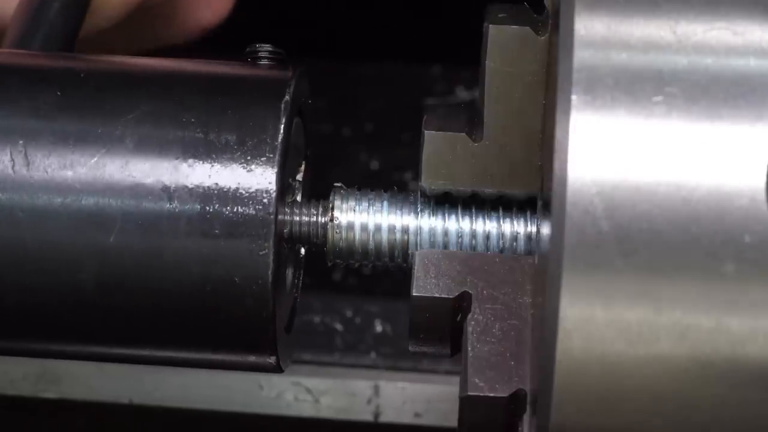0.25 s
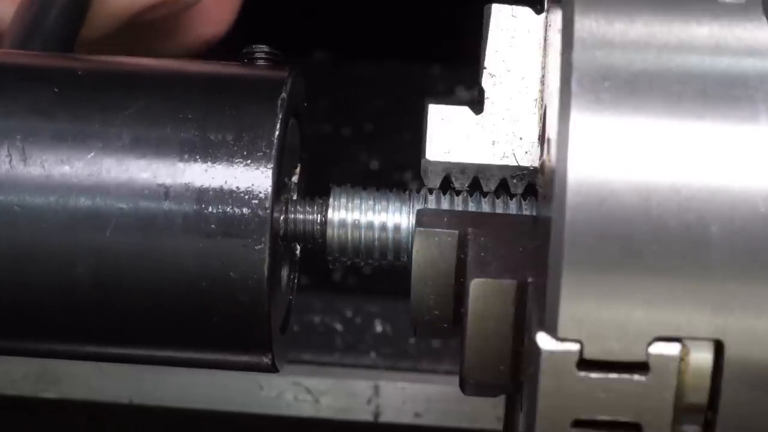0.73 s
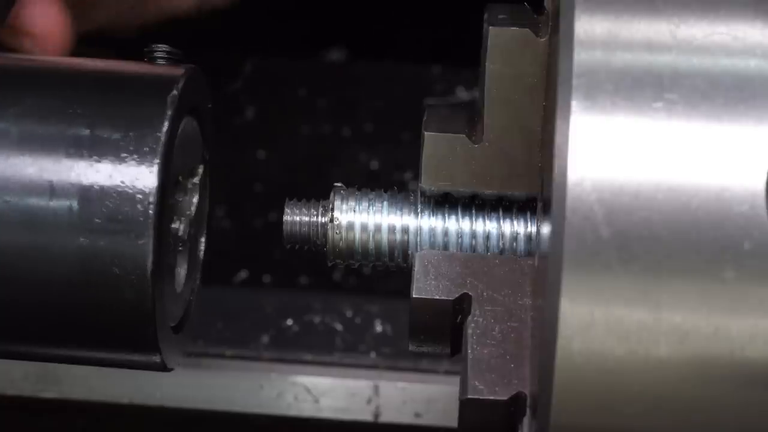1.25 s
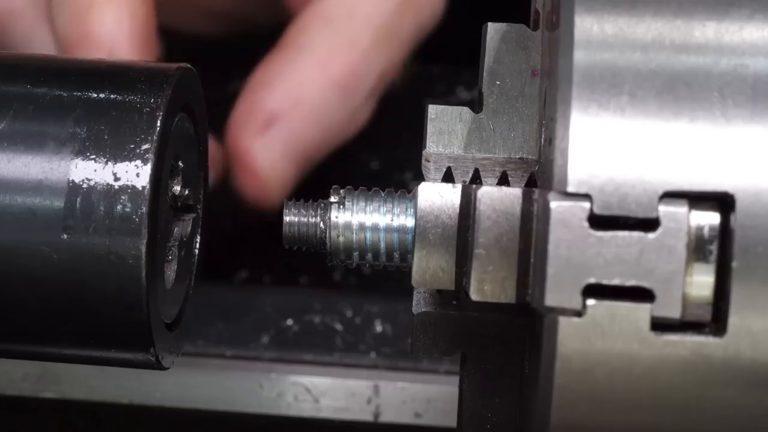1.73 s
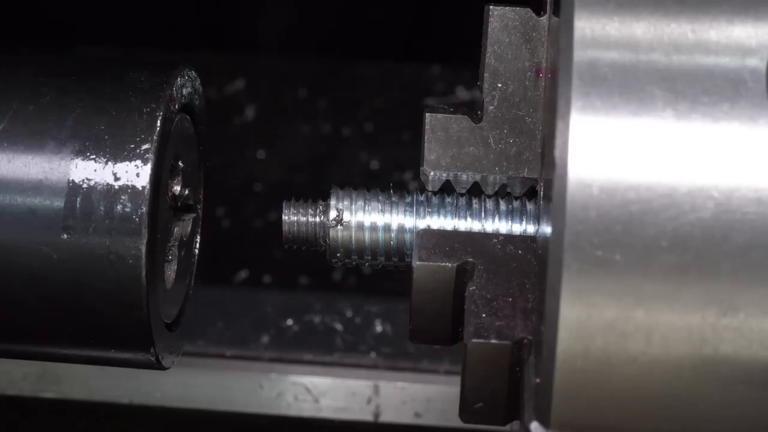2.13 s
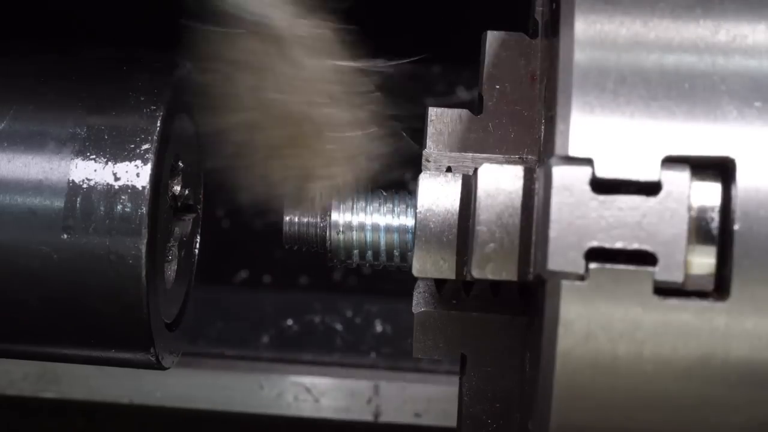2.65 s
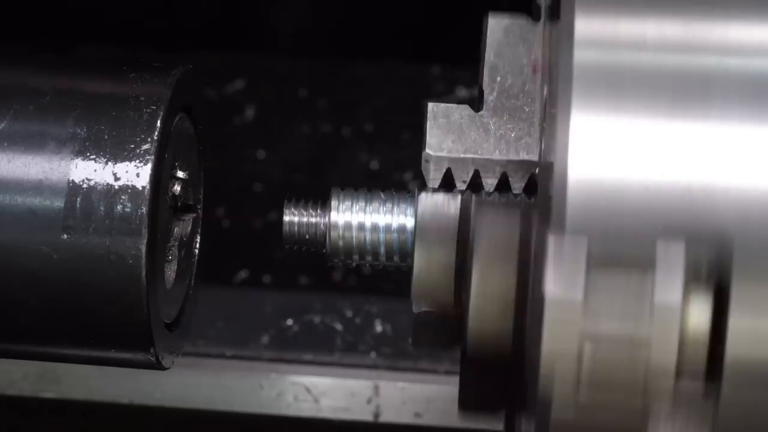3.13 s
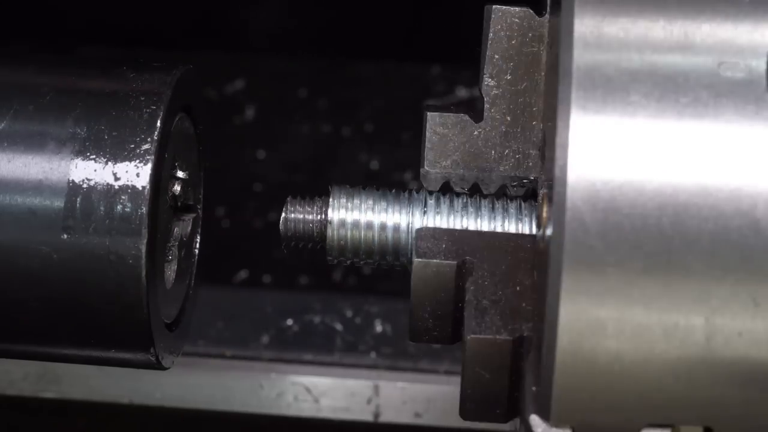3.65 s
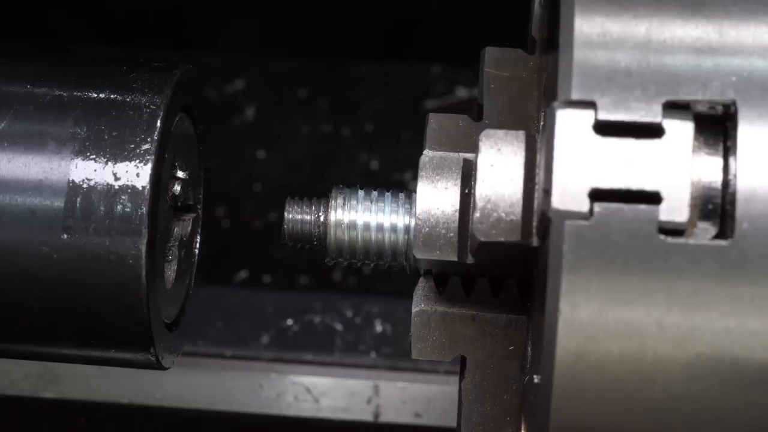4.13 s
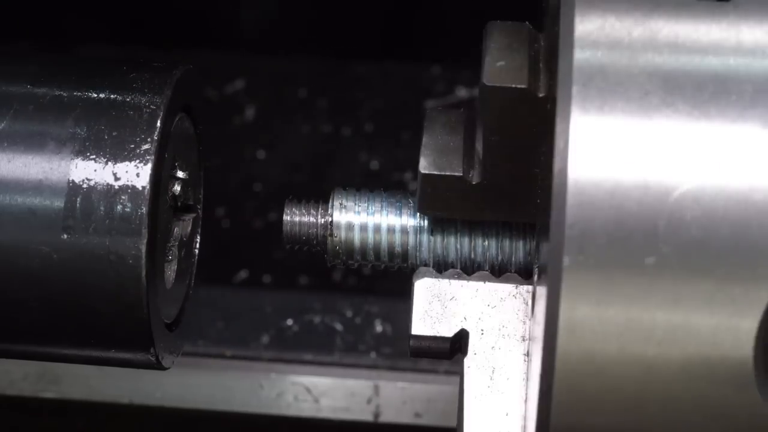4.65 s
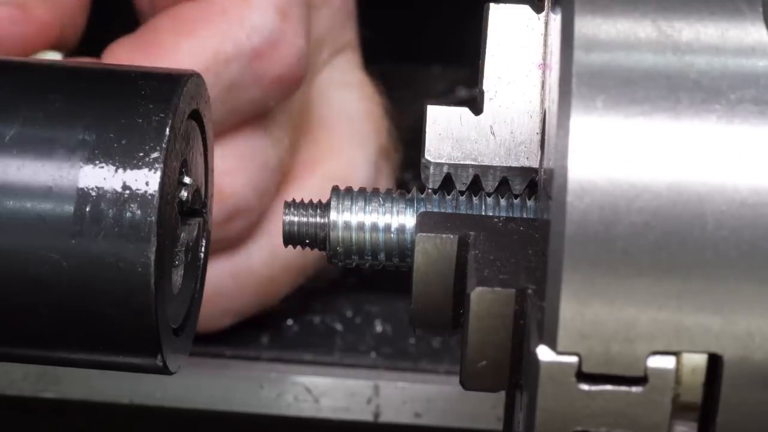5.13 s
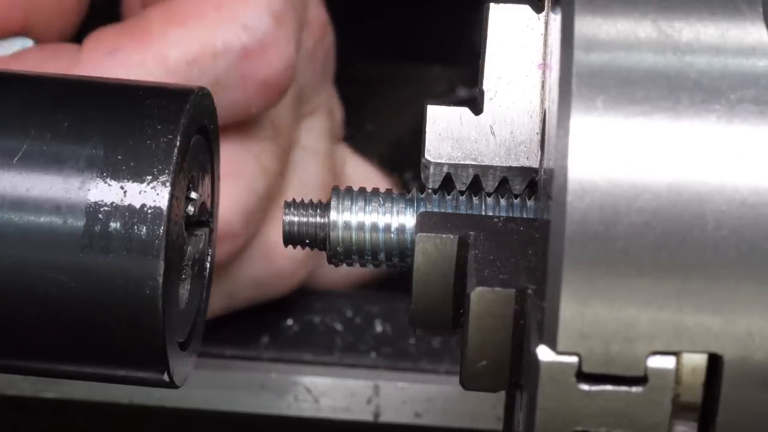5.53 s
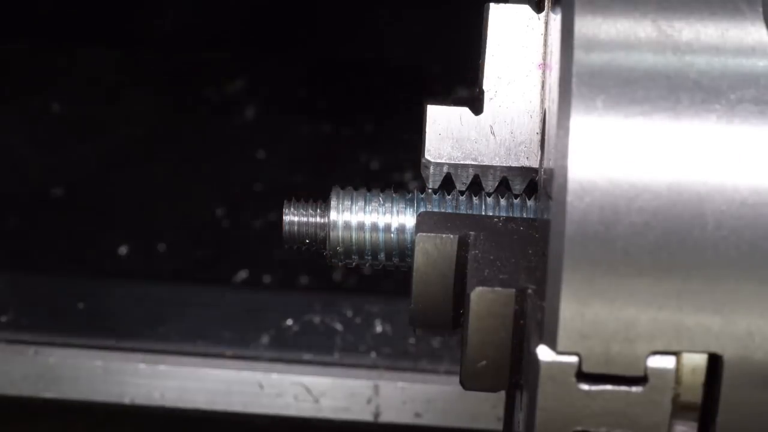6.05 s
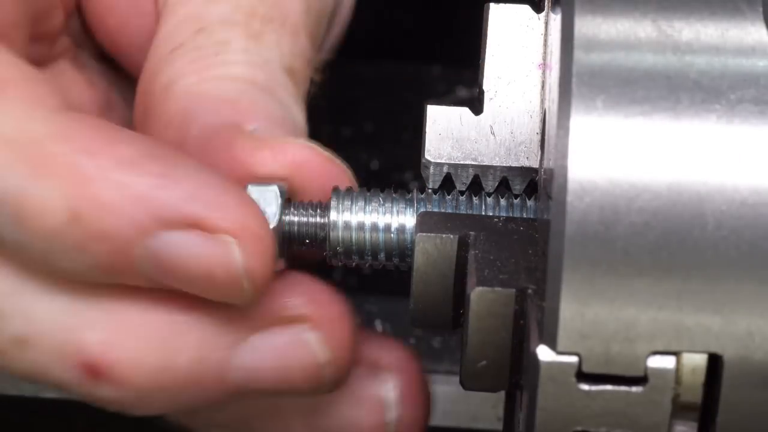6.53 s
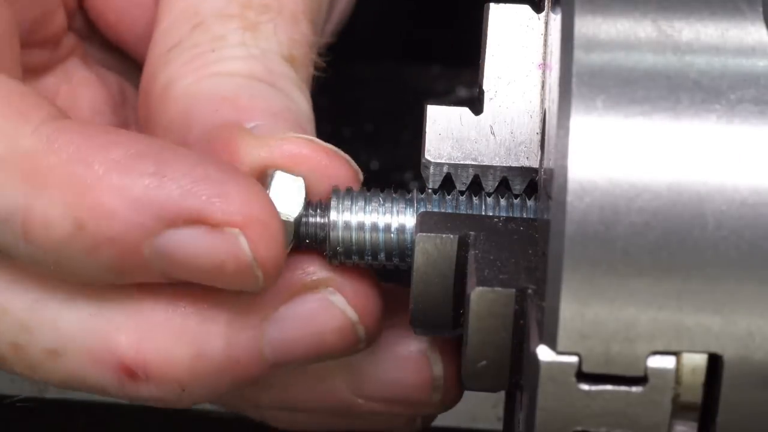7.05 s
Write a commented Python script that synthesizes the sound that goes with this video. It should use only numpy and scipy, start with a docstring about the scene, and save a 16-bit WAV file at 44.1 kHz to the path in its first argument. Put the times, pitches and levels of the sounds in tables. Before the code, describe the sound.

Close, dry, slightly left-leaning sounds of steel parts on a lathe: a rattling snap, irregular knocks with gritty rubbing and a hollow thud, then soft, quick bristle swishes with one thin clink. Sparse faint knocks lead to a double bang across the workshop. Handling resumes, bursting into hard knocks and bright, short-ringing clinks; one more distant bang echoes, then tiny ticks and light knocks as a nut is tried. Low hum and hiss underneath.

```python
"""A catch snaps over on a small lathe; a die holder is backed off a stud, its knocks and rubbing ringing
castings and steel as decaying modes while the bed thumps. Bristle noise brushes the thread, and a ferrule
clinks. Later something bangs further off in the workshop, a crack and a swelling echo; the holder is pulled
away in loud knocks and clinks, and a nut is tried with light knocks and bright ticks.
Filtered noise makes a faint hum and microphone hiss throughout."""
import sys
import numpy as np
from scipy import signal
from scipy.fft import rfft, irfft
from scipy.io import wavfile
from scipy.ndimage import uniform_filter1d

SR = 44100
rng = np.random.default_rng(int(sys.argv[2]) if len(sys.argv) > 2 else 0)


def digitize_waveform(pressure):
    """Quantize a signal to 16-bit integers and store it at the path in sys.argv[1].

    Rows of a 2-D input are taken as channels; values are limited to [-1, 1].
    """
    field = np.atleast_2d(pressure).T
    bounded = np.clip(field, -1, 1)
    quanta = np.round(bounded * 32767).astype(np.int16)
    wavfile.write(sys.argv[1], SR, quanta)


def attenuation_scalar(level_db):
    """Turn a level in dB into a linear amplitude multiplier (20 dB per decade)."""
    decades = np.asarray(level_db, float) / 20
    return 10 ** decades


N = 321930

# modes of the lathe castings: f/Hz, level/dB, t60/s
CASTING_MODES = [(358, 0.5, 0.02), (432, 6, 0.022), (520, -8.5, 0.079), (647.6, 3, 0.025),
                 (707, 4.5, 0.045), (828.6, 1, 0.049), (916, 14, 0.013), (1080, 2, 0.024), (1164, 6, 0.023)]
# modes of the steel parts: f/Hz, level/dB, t60/s
STEEL_MODES = [(1400, 3, 0.023), (1530, 4, 0.016), (1855, 6.5, 0.021), (2276, 0, 0.034), (2360, 2, 0.019),
               (2495, -8.5, 0.048), (3033, -3, 0.044), (3315, -3.5, 0.039), (3640, 4.5, 0.025),
               (4028, 7, 0.012), (4460, -3, 0.016)]
# spectrum of a bright scratch: f/Hz, density level/dB
EDGE_SPECTRUM = [(4000, -10.5), (5500, -3.5), (8000, -2), (11000, 1.5), (14000, -10), (16500, -30.5)]


def evened(x):
    """Normalization to rms 1, the root of the mean power."""
    return x / np.sqrt(np.mean(x ** 2) + 1e-20)


def peaked(x):
    """Normalization to peak magnitude 1."""
    return x / (abs(x).max() + 1e-20)


def read(points, hz):
    """Linear interpolation of a spectrum on a logarithmic frequency axis."""
    f, value = np.transpose(points)
    return np.interp(np.log(hz + 1), np.log(f + 1), value)


def add(mix, s, sound):
    """Superposition: a sound is summed into the mix from s seconds on."""
    part = mix[..., round(s * SR):][..., :sound.shape[-1]]
    part += sound[..., :part.shape[-1]]


def smooth_noise(size, width):
    """Moving average as a low-pass: slow random fluctuation of rms 1."""
    return evened(uniform_filter1d(rng.standard_normal(size), size=width))


def coloured(points, size):
    """Spectral shaping: white noise weighted to a given spectrum, rms 1."""
    z = rfft(rng.standard_normal(size))
    z = z * attenuation_scalar(read(points, np.fft.rfftfreq(size, 1 / SR)))
    return evened(irfft(z, size))


def humming(peaks, size):
    """Resonance: noise of rms 1 under a sum of broad peaks."""
    hz = np.fft.rfftfreq(size, 1 / SR)
    colour = sum(attenuation_scalar(db) / (1 + (2 * (hz - f) / width) ** 2) for f, width, db in peaks)
    return evened(irfft(rfft(rng.standard_normal(size)) * colour, size))


def ring(modes, size, spread_db, detune):
    """Modal decay: a row a mode; every blow lands elsewhere and weighs and tunes the modes anew."""
    hz, db, t60 = np.transpose(modes)[:, :, None]
    weigh, shift = rng.standard_normal((2, len(modes), 1))
    t = np.arange(size) / SR
    decay = attenuation_scalar(db + spread_db * weigh - 60 * t / np.maximum(t60, .005))
    onset = 1 - np.exp(-(hz * t / 1.465) ** 2)  # takes about a cycle
    return decay * onset * np.sin(2 * np.pi * hz * (1 + detune * shift) * t)


def contact(ms, size):
    """Contact force: a rough burst that swells and dies on the time scale ms."""
    u = np.arange(size) / SR * 1000 / max(ms, .1)
    return rng.standard_normal(size) * u ** 0.89 * np.exp(-4.5 * u)


def struck(force, modes):
    """Forced response: the force convolved with the impulse response of the modes; peak 1."""
    return peaked(signal.fftconvolve(force, modes)[:len(force)])


def placed(x, pan_db):
    """Intensity stereo: left exceeds right by pan_db."""
    return x * attenuation_scalar([[pan_db / 2], [-pan_db / 2]])


def clack(ms):
    """Impact sequence: a scuff of the faces, the blow 20 ms in, and its bounce."""
    late = round(rng.uniform(4, 12) * SR / 1000)  # the faces meet again 4-12 ms later
    t_ms = np.arange(4096) / SR * 1000 - 20
    bounce = np.roll(contact(ms, size=4096), late)
    blow = peaked(contact(ms, size=4096) + attenuation_scalar(-12.5) * bounce)
    scuff = rng.standard_normal(4096) * np.exp(np.minimum(t_ms, 0) / 2.9) * (t_ms < 0) / 3
    return np.roll(blow, round(.02 * SR)) + attenuation_scalar(-16.5) * scuff


def near_pitch(modes, hz, fall_db):
    """Selective excitation: modes weaken by fall_db an octave away from the pitch of the spot hit."""
    mode_hz = np.transpose(modes)[0][:, None]
    share = attenuation_scalar(-fall_db * abs(np.log2(mode_hz / hz)))
    return (share * ring(modes, 3000, spread_db=2, detune=.015)).sum(0)


def knocks():
    """Impact excitation: each blow rings casting and steel, and loose parts rattle on."""
    # blows on the lathe: t/s, casting level/dB, casting f/Hz, steel re casting level/dB, steel f/Hz
    blows = [(0.334, -47, 700, -33, 1360), (0.36, -36.5, 640, -6, 1300), (0.393, -39, 565, 1.5, 2760),
             (0.421, -38, 650, -11.5, 1840), (0.572, -43, 611, -22, 1370), (0.604, -30, 670, -31, 1330),
             (0.616, -24, 640, -26, 1830), (0.66, -39, 650, 5, 1860), (0.811, -63.5, 479, 21.5, 2160),
             (0.852, -26, 900, -10, 1870), (0.994, -39, 820, -15, 3500), (1.002, -29, 880, 3.5, 2990),
             (1.011, -34, 883, -2, 3560), (1.029, -48, 950, 14, 1300), (1.189, -27, 850, 2, 3070),
             (1.198, -21, 880, -6, 1800), (1.209, -43, 640, 4, 3600), (1.234, -46, 891, 5, 2200),
             (1.26, -34.5, 795, -11, 1880), (1.333, -41.5, 774, -11, 1300), (1.53, -44, 820, -7, 1840),
             (1.554, -46, 590, 6.5, 2220), (1.572, -20.5, 796, -7, 1320), (1.627, -28, 490, -7, 2500),
             (1.881, -42.5, 1090, -5.5, 1300), (1.932, -55, 750, 4, 1850), (2.321, -52, 490, -3, 2170),
             (3.166, -42, 1300, 10, 1450), (3.214, -53, 706, -5, 2460), (3.469, -48.5, 870, 10.5, 1990),
             (3.522, -53, 686, 2, 1400), (3.626, -51, 850, 6, 2290), (3.73, -54, 640, -9, 1310),
             (3.769, -49.5, 700, -17, 1380), (4.358, -51, 1160, 0, 1350), (4.927, -44.5, 1300, 4, 2410),
             (5.111, -24, 866, 1.5, 1300), (5.12, -29.5, 714, -8, 1300), (5.155, -35.5, 800, 4, 1320),
             (5.177, -29.5, 764, -12, 1900), (5.227, -32.5, 770, -10, 2130), (5.273, -49.5, 557, 6.5, 1400),
             (5.322, -38.5, 835, -4, 1760), (5.704, -23.5, 790, -20, 1540), (5.719, -18, 1020, 6.5, 2360),
             (5.743, -13.5, 890, -9, 1300), (5.761, -8, 830, -8, 1880), (5.783, -9, 940, -10, 1530),
             (5.799, -17, 759, -9, 1380), (5.814, -27, 720, 5, 1300), (5.825, -19, 840, -3, 1900),
             (5.836, -10.5, 850, -9.5, 1780), (5.883, -32.5, 719, 9, 3640), (5.904, -20, 772, 0, 1380),
             (5.921, -16, 1200, -8, 1450), (6.524, -38.5, 1200, 2, 2480), (6.544, -44, 710, 7, 2000),
             (6.578, -44, 1200, -6, 1285), (6.788, -45, 808, 4.5, 3530), (6.954, -43.5, 780, 7.5, 2370),
             (6.969, -38.5, 802, -4.5, 2890), (7.105, -52, 635, 0.5, 1970)]
    # loose parts after a knock: f/Hz, density level/dB
    shake_spectrum = [(250, -27), (600, -3), (1000, 1), (2200, -8.5), (4000, -17), (7000, -16.5),
                      (12000, -37.5)]
    out, t = np.zeros(N), np.arange(4096) / SR
    seated = np.maximum(t - .02, 0)
    for s, db, low_hz, steel_db, steel_hz in blows:
        ms = max(9 - 0.01 * steel_db, 2)  # a duller knock, with less steel in it, lasts longer
        casting = struck(clack(ms), near_pitch(CASTING_MODES, low_hz, fall_db=19.0))
        steel = struck(clack(ms), near_pitch(STEEL_MODES, steel_hz, fall_db=13.5))
        shake = coloured(shake_spectrum, size=4096)
        shake = shake * np.exp(-seated / 0.038) * (1 - np.exp(-seated / 0.0045))
        loudest = max(1, attenuation_scalar(steel_db))
        knock = casting + attenuation_scalar(steel_db) * steel + attenuation_scalar(-25) * loudest * shake
        add(out, s - .02 - .00015 * ms, attenuation_scalar(db) * knock)
    return out


def thuds():
    """Modal resonance: the tailstock settles and its low modes give a hollow thud."""
    # settling of the tailstock: t/s, peak level/dB
    settlings = [(1.626, -23), (2.32, -46.5), (4.82, -45.5)]
    # modes of the tailstock: f/Hz, level/dB, t60/s
    tailstock_modes = [(281, -1.5, 0.15), (340, -3.5, 0.18), (389, -6.5, 0.067), (529, 14.5, 0.055),
                       (690, -26, .08)]
    out = np.zeros(N)
    for s, db in settlings:
        body = ring(tailstock_modes, 8000, spread_db=0.5, detune=0.013).sum(0)
        add(out, s, attenuation_scalar(db) * struck(contact(1.5, size=8000), body))
    return out


def rubs():
    """Stick-slip: a stream of uneven slips excites casting and steel, with a grainy hiss on top."""
    casting, steel, hiss = pressure()
    slips = attenuation_scalar(4.5 * np.minimum(rng.exponential(1, (2, N)), 5)) * rng.standard_normal((2, N))
    slips *= rng.random((2, N)) < [[2500 / SR], [6000 / SR]]  # mean slips a second
    out = 0
    for slip, level, modes in zip(slips, (casting, steel), (CASTING_MODES, STEEL_MODES)):
        spot = rng.integers(0, 3, N // 2048 + 1).repeat(2048)[:N]  # the contact wanders over three spots
        for k in range(3):
            body = ring(modes, 2048, spread_db=3, detune=.03).sum(0)
            force = evened(slip) * level * (spot == k)
            out = out + signal.oaconvolve(force, body / np.linalg.norm(body))[:N]
    grain = attenuation_scalar(1.5 * smooth_noise(N, 120))
    return out + hiss * evened(coloured(EDGE_SPECTRUM, size=N) * grain)


def pressure():
    """Friction drive: each slide swells and fades; brightness shares it among casting, steel and hiss."""
    # parts slide and hands move: t/s, length/s, pressure level/dB, brightness (0 casting, 1 skin and edges)
    slides = [(0.303, 0.15, -44.5, 0.065), (0.563, 0.23, -61, 0.3), (0.814, 0.46, -50, 0.19),
              (1.16, .23, -45, 0.3), (1.453, 0.18, -55.5, 0.18), (1.583, 0.77, -66, 0.71),
              (2.926, 0.43, -62.5, 0.066), (3.397, 0.17, -50.5, 0.24), (3.691, 0.14, -55, 0.25),
              (4.3, .22, -52, 0.29), (4.817, 0.27, -54.5, .65), (5.106, 0.17, -51.5, 0.61),
              (0.268, .12, -69, 0.79), (5.243, 0.15, -58, 0.2), (5.335, 0.069, -57, 0.49),
              (5.474, 0.39, -56.5, 0.76), (5.632, 0.065, -32.5, 0.69), (5.691, .12, -22, 0.28),
              (5.775, .09, -23, 0.17), (5.875, 0.065, -26, .3), (6.224, 0.34, -63, 0.7)]
    peak_at, fade_db = 0.31, 18  # peak as a share of the length; fade to both ends
    casting_loss_db, steel_loss_db, hiss_loss_db, hiss_db = 28.5, 21, 29, 1  # losses away from each one's best
    background = attenuation_scalar((-86, -79.5, -70))  # steady faint background: casting, steel, hiss
    out = background[:, None] * np.ones(N)
    for s, length, db, bright in slides:
        u = np.arange(0, length, 1 / SR) / length
        away = np.where(u < peak_at, 1 - u / peak_at, (u - peak_at) / (1 - peak_at))
        share_db = [[-casting_loss_db * bright],
                    [-steel_loss_db * abs(2 * bright - 1)],
                    [hiss_db - hiss_loss_db * (1 - bright)]]
        swell = attenuation_scalar(db - fade_db * away ** 2) * np.minimum(1, 8 * (1 - away))
        add(out, s, swell * attenuation_scalar(share_db))
    return out


def clinks():
    """Damped modal ringing: a sharp tick; loose chatter keeps the modes going until the ring breaks off."""
    # hard steel clinks: t/s, tick level/dB, ring re tick level/dB, ring length/s, part struck
    strikes = [(2.7275, -48, -1, 0.044, "ferrule"), (5.1205, -24.5, -19, 0.031, "die"),
               (5.328, -36, 6.5, 0.034, "die"), (5.3413, -12.5, -19, 0.061, "die"),
               (5.616, -6, -9.5, 0.07, "holder"), (5.7349, -14.5, -20.5, 0.031, "holder"),
               (5.7831, -7, -14, 0.069, "holder"), (5.885, -29, -15.5, 0.077, "holder")]
    # loose rattle after the strike, by part: level re tick/dB
    jingle_db = {"holder": -22, "die": -34, "ferrule": -3}
    # modes of the holder: f/Hz, level/dB, t60/s
    holder_modes = [(2372, -2, .15), (2415, -2, .12), (2520, -6, .08), (3640, -6, .06), (4320, -12, .08),
                    (6170, -12, .15), (7610, -10, .1), (8360, -13, .12), (8915, -9, .15), (9636, -3, .16),
                    (10360, -9, .1), (11290, -2, .07), (12170, -12, .08), (13960, -17, .15),
                    (14800, -22, .1)]
    # modes of the die: f/Hz, level/dB, t60/s
    die_modes = [(5523, -7, .4), (6756, 0, .1), (9711, 0, .15), (10340, -2, .25), (13200, -12, .05),
                 (15080, -14, .08)]
    # modes of the ferrule: f/Hz, level/dB, t60/s
    ferrule_modes = [(9243, -5, .2), (9890, 0, .2), (10997, 0, .2), (12440, -8, .15)]
    parts = {"holder": holder_modes, "die": die_modes, "ferrule": ferrule_modes}
    out, t = np.zeros(N), np.arange(9000) / SR
    for s, db, ring_db, ring_s, part in strikes:
        body = ring(parts[part], 9000, spread_db=2.5, detune=0.0025).sum(0)
        chatter = rng.standard_normal(9000) * (rng.random(9000) < 700 / SR) * np.exp(-t / 0.054)
        grain = attenuation_scalar(2.2 * smooth_noise(9000, 90))
        rattle = evened(coloured(EDGE_SPECTRUM, size=9000) * grain) * np.exp(-t / 0.04) / 3
        tick = peaked(coloured(EDGE_SPECTRUM, size=9000) * np.exp(-t / 0.0016))
        wobble = attenuation_scalar(2.5 * smooth_noise(9000, 250))  # loose seat
        ringing = wobble * struck(contact(3.2, size=9000) + 0.27 * chatter, body)
        after = attenuation_scalar(ring_db) * ringing + attenuation_scalar(jingle_db[part]) * rattle
        cut_off = after / (1 + np.exp((t - ring_s) / 0.01))
        add(out, s, attenuation_scalar(db) * (tick + cut_off))
    return out


def snaps():
    """Impact excitation: a small catch snaps over and bounces, a rattling contact ringing its modes."""
    # snap and bounce: t/s, level/dB
    moments = [(0.258, -10), (0.275, -14.5)]
    # modes of the catch: f/Hz, level/dB, t60/s
    catch_modes = [(1400, 4.5, 0.052), (1880, -0.5, 0.034), (2460, 0, 0.027), (3560, -10, 0.09),
                   (4620, 3, 0.02), (4820, -72, 0.008), (6000, 8.5, 0.031), (6570, -5.5, 0.059),
                   (8000, -5, 0.04), (8600, -7, .03)]
    # rattle of the catch: f/Hz, density level/dB
    rattle_spectrum = [(500, -19), (1300, 0), (3000, 0.5), (6000, 3.5), (9000, -5.5), (13000, -17),
                       (16500, -13)]
    out, t = np.zeros(N), np.arange(8000) / SR
    for s, db in moments:
        body = ring(catch_modes, 7200, spread_db=-2.0, detune=0.0054).sum(0)
        ringing = struck(contact(6.0, size=8000), body)
        decay = np.exp(-t / 0.012) + 0.13 * np.exp(-t / 0.044)
        rattle = peaked(coloured(rattle_spectrum, size=8000) * decay)
        add(out, s, attenuation_scalar(db) * (0.73 * ringing + 0.6 * rattle))
    return out


def brush():
    """Granular excitation: bristles flick over the thread as dense ticks under a swell, with a dull push."""
    # strokes: t/s of the rise, bristle peak level/dB, time scale/ms, dull push re bristles level/dB
    strokes = [(1.3138, -31.5, 22, -24), (2.1514, -40, 30.4, -39), (2.3144, -45, 17.5, -9.5),
               (2.3475, -35.5, 17, -34), (2.433, -36, 22.4, -26), (2.4534, -31, 14.2, -22),
               (2.5583, -29.5, 14.2, -24.5), (2.668, -39, 12, -28), (2.7852, -32, 12, -20),
               (2.8047, -24.5, 19.8, -19.5), (2.8928, -31, 16.5, -23), (2.9136, -26, 13.2, -17)]
    # spectrum of the bristles: f/Hz, density level/dB
    bristle_spectrum = [(1180, -33), (2000, -2), (3260, -5), (4300, 3.5), (6940, -8), (8400, -1),
                        (11000, 4.5), (14300, 0.5), (16000, 3.5)]
    out = np.zeros(N)
    for s, db, ms, dull_db in strokes:
        u = np.arange(4000) / SR * 1000 / ms
        swell = np.exp(-((u - 1.1) / np.where(u < 1.1, .55, .3)) ** 2)  # builds slowly, flicks off fast
        grain = attenuation_scalar(2.5 * uniform_filter1d(rng.standard_normal(4000), size=30) * 5.5)
        bristles = peaked(coloured(bristle_spectrum, size=4000) * grain * swell)
        body = ring(CASTING_MODES, 1400, spread_db=0.5, detune=0.0023).sum(0)
        push = signal.fftconvolve(rng.standard_normal(4000), body)[:4000]
        stroke = bristles + attenuation_scalar(dull_db) * peaked(push * swell)
        add(out, s - 0.00045 * ms, attenuation_scalar(db) * stroke)
    return out


def ticks():
    """Transient scratching of chips and edges: bright noise builds to a peak, then snaps and drags off."""
    # ticks: t/s, peak level/dB, tilt/dB an octave, left minus right level/dB, drag/ms
    scratches = [(0.3945, -39, -1, 5, 6), (0.6639, -37.5, -19, -4, 8), (1.0051, -32, -17.5, -2, 11),
                 (1.1044, -39.5, -11, -4, 6), (1.1972, -26, -22, 3, 9), (1.5559, -38.5, -1.5, 3, 7),
                 (2.3574, -53, -21, -3, 6), (2.736, -42, -28, .1, 3), (2.879, -45, -19, 6, 3),
                 (4.9252, -34, -6.5, 1, 16), (5.1138, -28.5, -13, 4, 14), (5.1771, -34, -23, 7, 6),
                 (5.3406, -25.5, -6.8, 10.5, 16), (5.7204, -21, -16.5, 5.5, 6), (5.9075, -30, -7.5, 2.5, 5),
                 (6.3694, -47.5, -6, -0.8, 5), (6.5241, -23.5, 22, -3, 3), (6.577, -39, -13, -3.5, 4),
                 (6.7865, -46, 8, -6, 5), (6.7955, -43.5, 8, 3, 5), (6.9616, -31, 4, -1.2, 3)]
    out, t_ms = np.zeros((2, N)), np.arange(4000) / SR * 1000 - 30
    for s, db, tilt_db, pan_db, ms in scratches:
        colour = [(f, level + tilt_db * np.log2(f / 9000)) for f, level in EDGE_SPECTRUM]
        rise = np.exp(-abs(t_ms) / (0.29 * ms))
        fall = np.exp(-abs(t_ms) / 0.67) + attenuation_scalar(-3.5) * np.exp(-abs(t_ms) / ms)  # a snap, the drag under it
        scratch = coloured(colour, size=4000) * np.where(t_ms < 0, rise, peaked(fall))
        add(out, s - .03, placed(attenuation_scalar(db) * peaked(scratch), pan_db))
    return out


def grinds():
    """Friction noise: threads grind past each other in the broad resonances of stud and die."""
    # grinds: t/s, rms level before fades/dB, length/s
    turns = [(0.345, -54, 0.059), (0.482, -55.5, 0.048), (0.756, -55.5, 0.036), (1.051, -58, 0.047),
             (1.677, -60.5, 0.064), (4.829, -61, 0.066), (4.983, -65, 0.057), (5.201, -52, 0.056),
             (6.291, -62.5, 0.089), (6.422, -65, 0.055)]
    # resonances of stud and die: f/Hz, width/Hz, level/dB (before scaling by root width)
    thread_peaks = [(2117, 130, 5), (4500, 900, -8.5), (6700, 14000, 2), (11000, 1700, -4)]
    out, hz = np.zeros(N), np.fft.rfftfreq(8192, 1 / SR)
    colour = sum(attenuation_scalar(db) / np.sqrt(width) / (1 + (2 * (hz - f) / width) ** 2)
                 for f, width, db in thread_peaks)
    for s, db, length in turns:
        rasp = evened(irfft(rfft(rng.standard_normal(8192)) * colour))[:round(length * SR)]
        add(out, s, attenuation_scalar(db) * rasp * signal.windows.tukey(len(rasp), .45))
    return out


def squeaks():
    """Frequency glide: a tiny soft tone slides up in pitch."""
    # squeaks: t/s, peak level/dB, middle f/Hz, length/s
    tones = [(2.058, -50.5, 2510, 0.016), (2.206, -60, 1390, 0.021)]
    glide = 0.053  # rise as a share of the pitch
    out = np.zeros(N)
    for s, db, hz, length in tones:
        t = np.arange(0, length, 1 / SR)
        cycles = hz * t * (1 + glide * (t / length - 1) / 2)
        add(out, s, attenuation_scalar(db) * np.hanning(len(t)) * np.sin(2 * np.pi * cycles))
    return out


def thumps():
    """Low-frequency modes: the bed jolts on the bench, a main swing with weaker ones and a soft start."""
    # jolts: t/s, peak level/dB, main swing f/Hz, main swing t60/s
    jolts = [(0.428, -42, 104, 0.21), (0.618, -46, 307, 0.14), (0.853, -40, 119, 0.096),
             (1.017, -38, 118, 0.068), (1.207, -44.5, 120, 0.37), (1.341, -42.5, 121, 0.24),
             (1.577, -31.5, 122, 0.042), (1.633, -34, 179, 0.22), (4.476, -40.5, 341, 0.22),
             (4.926, -48, 119, 0.09), (5.113, -39, 111.3, 0.39), (5.172, -33.5, 113, 0.044),
             (5.327, -43, 174, 0.075), (5.764, -37.5, 185, 0.19), (5.898, -39, 162, 0.13)]
    out = np.zeros(N)
    for s, db, hz, t60 in jolts:
        modes = [(hz, 0, t60), (118, -4, t60), (176, -7, t60), (290, -9, 0.23 * t60)]
        swing = ring(modes, 12000, spread_db=2.0, detune=.015).sum(0)
        add(out, s, attenuation_scalar(db) * peaked(swing))
    return out


def bangs():
    """Direct sound and reflections: a short noise rise, a crack, then wall echo, unlike at each ear."""
    # far bangs: t/s, level/dB, crack at 3900 Hz level/dB, crack treble level/dB, echo length/s
    blasts = [(4.476, -9.5, 9, -24, 0.062), (4.531, -14.5, -5.5, -40, 0.029), (5.989, -4, -6, -31.5, 0.066)]
    # colour of the echo: f/Hz, density level/dB
    echo_spectrum = [(59, -58), (100, -17), (324, -19.5), (452, -3), (524, -15), (688, -4), (983, -7),
                     (1770, -3.5), (3530, -3.5), (10700, -39.5), (15000, -73)]
    # what hums in the echo: f/Hz, width/Hz, level/dB
    bench_peaks = [(610, 54, 0.5), (883, 30, -2.5), (1087, 33, 1), (1800, 32, -0.5), (2395, 78, -0.5),
                   (2435, 56, -65), (3230, 190, -4), (3733, 36, 1), (4700, 35, -14), (4940, 120, -14.5)]
    bench_db, walls_db, rise_db, rise_s = -5.5, -18, -25.5, 0.0047  # hum re plain echo; echo; noise rise
    out, t = np.zeros((2, N)), np.arange(9000) / SR - .015
    after = np.maximum(t, 0)
    for s, db, edge_db, treble_db, length in blasts:
        colour = [(150, -32), (600, 0.8), (2200, 4.5), (3900, edge_db),
                  (7500, 0.64 * treble_db), (16000, treble_db)]
        shape = np.exp(-after / 0.0039) * (1 - np.exp(-(after / 0.0012) ** 2))
        shape = shape + attenuation_scalar(rise_db) * np.exp(-abs(t) / rise_s)
        crack = np.array([peaked(coloured(colour, size=9000) * shape) for _ in "LR"])
        walls = np.array([coloured(echo_spectrum, size=9000) + attenuation_scalar(bench_db) * humming(bench_peaks, size=9000)
                          for _ in "LR"])
        swell = .5 + .5 * np.tanh((t - 0.13 * length) / (0.083 * length))
        swell = swell * np.exp(-(after / length) ** 1.64)
        swell = swell * attenuation_scalar(2.0 * smooth_noise(9000, 130))  # single echoes stand out
        echo = attenuation_scalar(walls_db) * swell * (walls + .15 * walls[::-1])
        add(out, s - .015, attenuation_scalar(db) * (1.2 * crack + .15 * crack[::-1] + echo))
    return out


def workshop(x, t60):
    """Reverberation: sparse taps of random sign, other ones per ear; the treble dies first."""
    taps = np.zeros((2, 8000))
    at = np.arange(200, 7980, 20) + rng.integers(0, 20, (2, 389))
    np.put_along_axis(taps, at, rng.choice([-1., 1.], at.shape), 1)
    hz, t, z = signal.stft(taps, SR, nperseg=128)
    decay = attenuation_scalar(-60 * t * (1 + hz[:, None] / 9000) / t60)
    tail = signal.istft(z * decay, SR, nperseg=128)[1]
    bass = uniform_filter1d(tail, size=24, axis=1)
    tail = tail - bass + bass.mean(0)  # long waves reach both ears alike
    return signal.oaconvolve(x[None], tail / np.linalg.norm(tail[0]), axes=1)[:, :N]


def quiet():
    """Partly coherent stationary noise: hum and hiss as wavering random spectra, with faint narrow tones."""
    # spectrum of hum and hiss: f/Hz, density level/dB
    floor_spectrum = [(15, -81), (25, -57.5), (85, -31), (142, 10.5), (220, -31.5), (296, -10), (553, -11),
                      (766, -9.5), (1830, -13.5), (2040, -11), (3230, -19.5), (4130, -18), (10700, -28.5),
                      (15200, -21), (16500, -42.5)]
    # left-right coherence: f/Hz, likeness
    likeness = [(60, 1), (180, 0.88), (550, 0.16), (1650, 0.062), (4970, 0.14), (15000, 1)]
    # faint steady tones: f/Hz, rms level/dB
    tone_table = [(10300, -81), (496.3, -79), (300, -78)]
    frames, hz = N // 256 + 5, np.fft.rfftfreq(1024, 1 / SR)
    a, b, c, d, patches = rng.standard_normal((frames, 513, 5)).T
    patches = uniform_filter1d(patches, size=14, axis=0)
    patches = evened(uniform_filter1d(patches, size=12, axis=1))
    same = np.clip(read(likeness, hz), -1, 1)[:, None]
    left = a + 1j * b
    right = same * left + np.sqrt(1 - same ** 2) * (c + 1j * d)
    z = np.array([left, right]) * attenuation_scalar(read(floor_spectrum, hz)[:, None] + 1.1 * patches)
    floor = evened(signal.istft(z, nperseg=1024, noverlap=768)[1][:, :N])
    tones = np.zeros(N)
    for f, db in tone_table:
        resonator = [1, -2 * .9985 * np.cos(2 * np.pi * f / SR), .9985 ** 2]
        tones += attenuation_scalar(db) * evened(signal.lfilter([1], resonator, rng.standard_normal(N)))
    return attenuation_scalar(-62) * floor + tones


def scene():
    """Superposition of near sounds a little to the left, their room, the far bangs and the quiet."""
    blows = knocks() + thuds() + rubs() + grinds() + squeaks()
    steel = clinks() + snaps() + brush()
    bright = ticks()
    near = placed(blows, pan_db=3.0) + placed(steel, pan_db=2.5) + bright + thumps()
    room = attenuation_scalar(-11.0) * workshop(blows, t60=0.11)
    room = room + attenuation_scalar(-11.5) * workshop(steel + bright.mean(0), t60=0.12)
    return near + room + bangs() + quiet()


def top_cut(x):
    """Nothing passes above the cut-off."""
    return signal.sosfilt(signal.butter(12, 16640, fs=SR, output="sos"), x)


def record(dry):
    """Band limiting: the microphone loses the deep bass and the top."""
    low_cut_hz, high_cut_hz = 85, 15900
    heard = signal.sosfilt(signal.butter(3, low_cut_hz, "high", fs=SR, output="sos"), dry)
    heard = signal.sosfilt(signal.cheby2(12, 50, high_cut_hz, fs=SR, output="sos"), heard)
    return top_cut(heard)


dry = scene()
out = record(dry)
digitize_waveform(out)
```